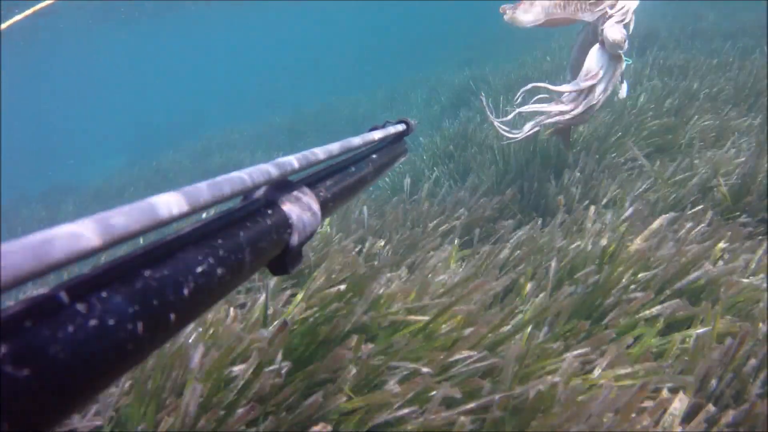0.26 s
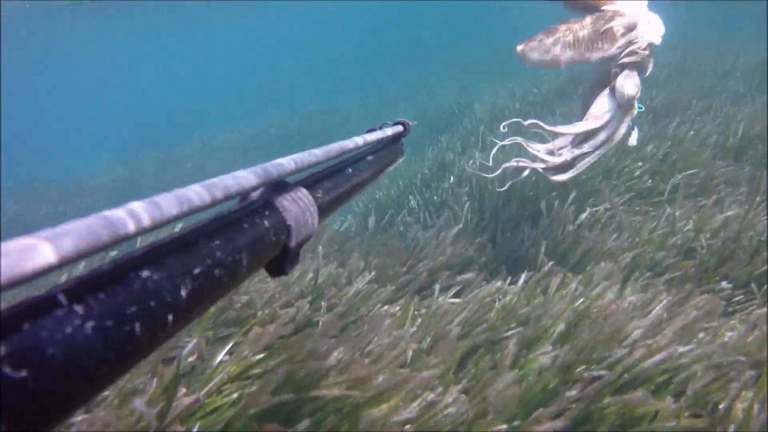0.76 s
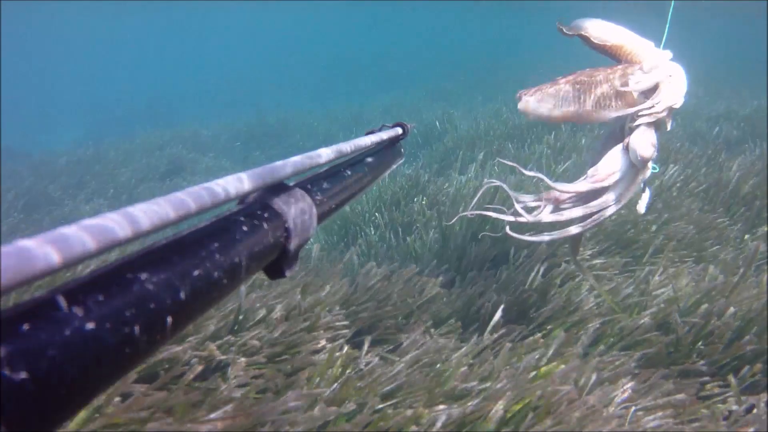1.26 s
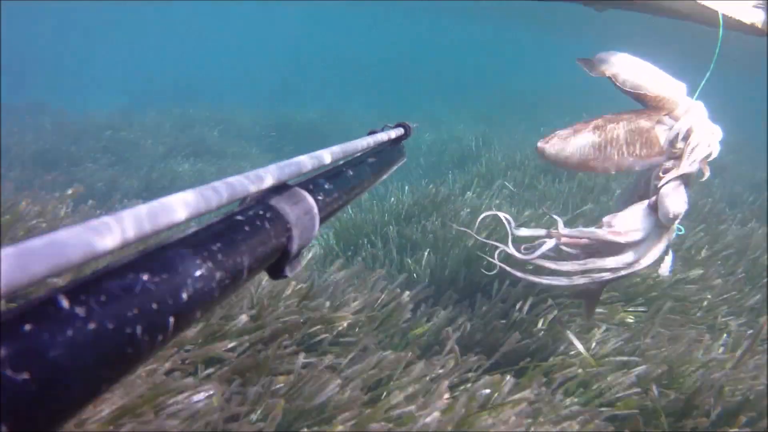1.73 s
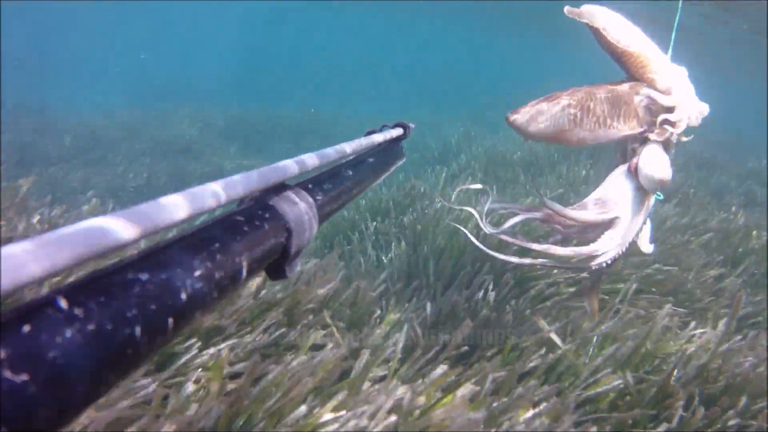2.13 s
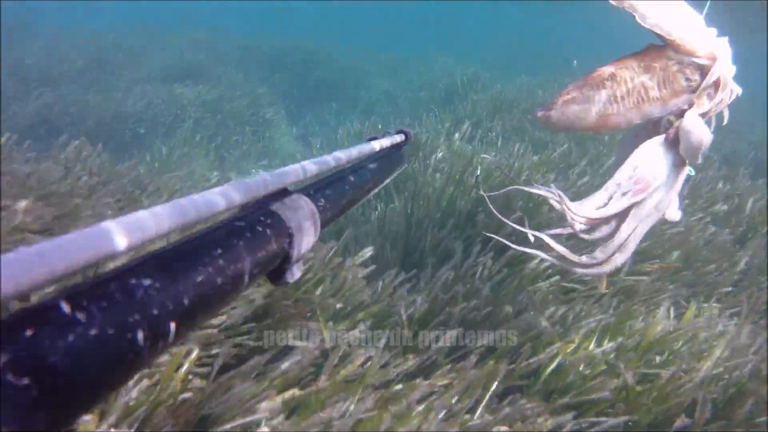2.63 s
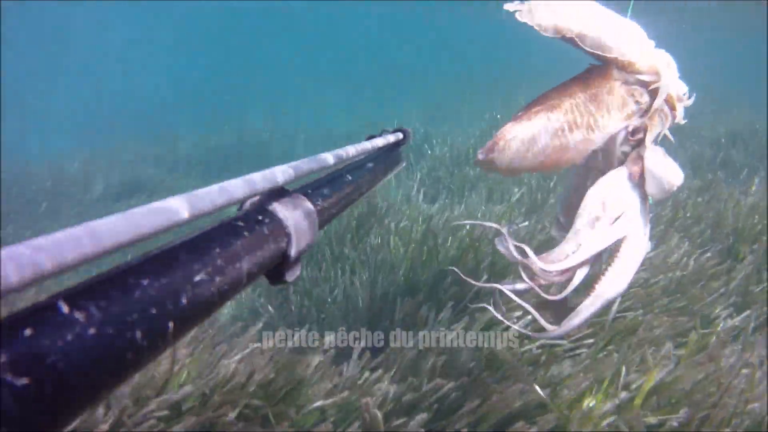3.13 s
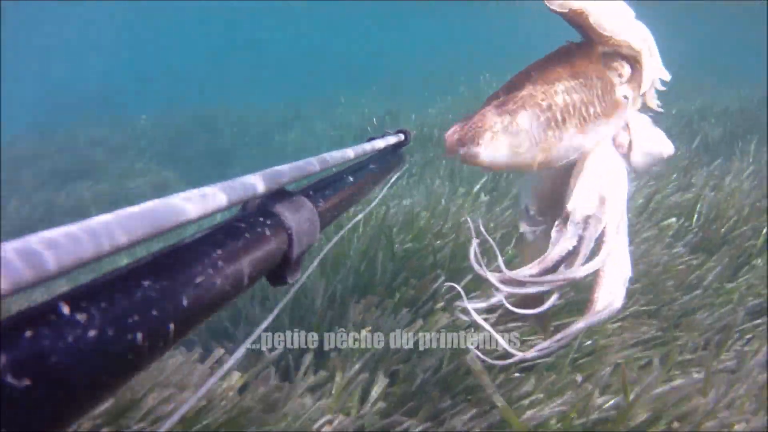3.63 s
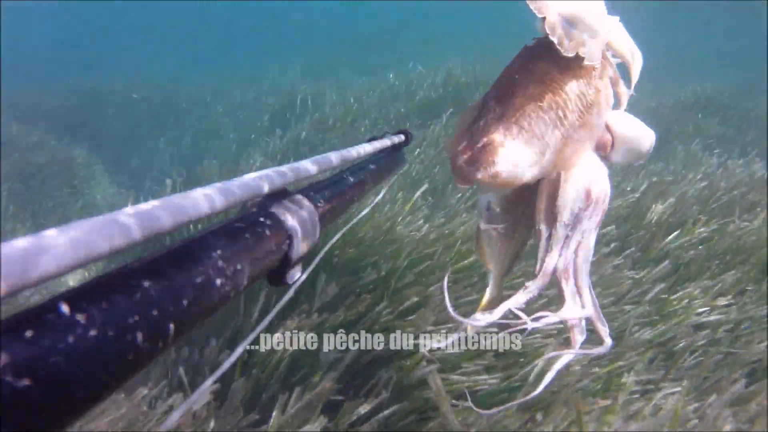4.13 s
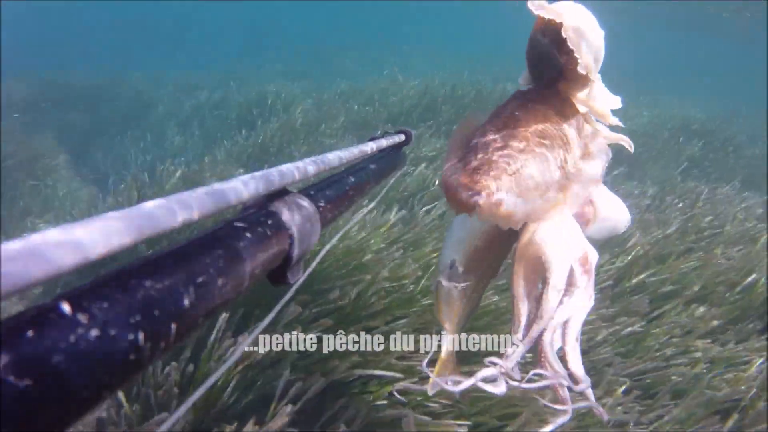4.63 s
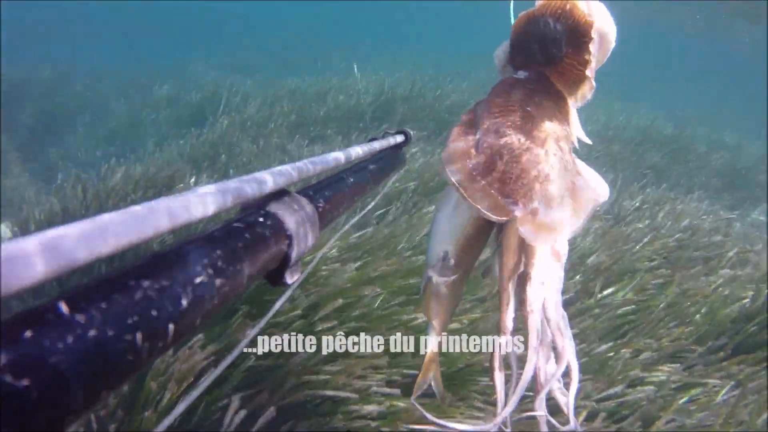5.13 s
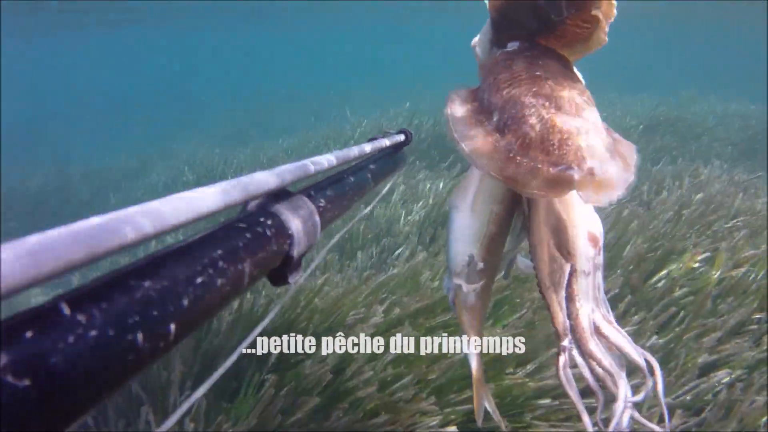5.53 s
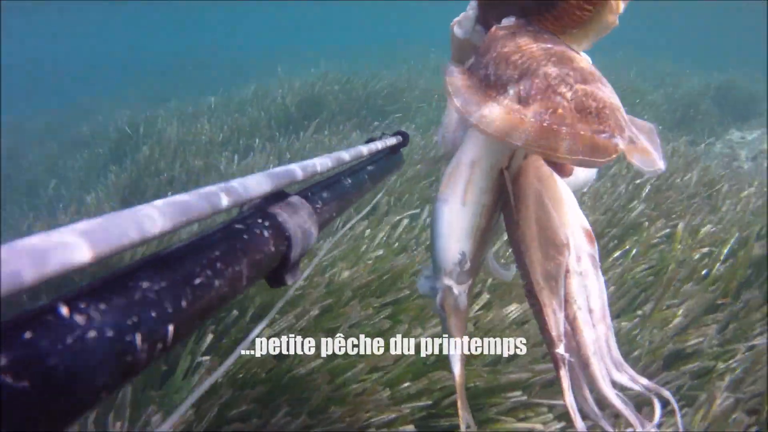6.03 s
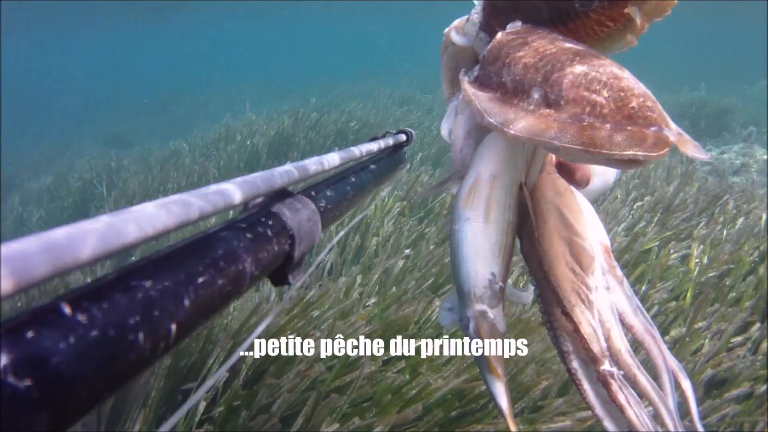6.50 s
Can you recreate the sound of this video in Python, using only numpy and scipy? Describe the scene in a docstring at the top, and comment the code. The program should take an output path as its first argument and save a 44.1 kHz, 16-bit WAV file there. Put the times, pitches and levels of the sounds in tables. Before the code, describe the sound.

Close, muffled underwater sound from a microphone sealed in a small housing. A faint wash and thin high hiss run throughout with scattered dry snaps, likely shrimp. A bubbly gulp and knock come early, then a hard bright clatter after two seconds, a heavier run of hollow clunks and rubbing past three, and softer bumps, sloshes and small bubbles until a loud snap near six.

```python
"""Inside a waterproof camera housing: a diver glides over seagrass with a speargun and a hanging catch.
Gear knocks and stutters as damped resonances of the housing; straps rub as jerky slips that ring it.
Water washes faintly and sloshes as lumpy coloured noise, and bubbles sound as decaying, rising tones.
Sharp ticks, likely snapping shrimp, are clusters of short high resonances.
The electronics add a band of high hiss and a thin, steady sine whine."""
import sys
import numpy as np
from scipy.fft import rfft, irfft, next_fast_len
from scipy.io import wavfile
from scipy.ndimage import map_coordinates

SR = 44100
rng = np.random.default_rng(int(sys.argv[2]) if len(sys.argv) > 2 else 0)


def dump(signal):
    """Clip the signal to [-1, 1] and save it as 16-bit WAV at the path in sys.argv[1]."""
    limited = np.clip(np.atleast_2d(signal).T, -1, 1)
    pcm = np.round(limited * 32767).astype(np.int16)
    wavfile.write(sys.argv[1], SR, pcm)


N = 298116


def amp(db):
    """Level law: decibels to amplitude gain."""
    return 10 ** (np.asarray(db) / 20)


def unit(x):
    """Normalization: x at an rms of 1."""
    return x / np.sqrt(np.mean(x ** 2) + 1e-20)


def clock():
    """Uniform sampling: the time of every sample [s]."""
    return np.arange(N) / SR


def wobble(rate):
    """Band-limited random modulation: a smooth curve through rate random knots a second."""
    knots = rng.standard_normal(int(N * rate / SR) + 4)
    return map_coordinates(knots, [clock() * rate])


def coloured(x, points):
    """Linear filtering: x shaped by points (frequency [Hz], relative level [dB]), at an rms of 1."""
    size = next_fast_len(N + 8192)  # padding keeps the end from wrapping to the start
    hz, db = np.transpose(points)
    log_hz = np.log(np.fft.rfftfreq(size, 1 / SR) + 1)
    gain = amp(np.interp(log_hz, np.log(hz), db))
    return unit(irfft(rfft(x, size) * gain, size)[:N])


def noise(points):
    """Spectral shaping: white noise coloured to an rms of 1."""
    return coloured(rng.standard_normal(N), points)


def swell(t, rise, t60):
    """Transient envelope: a Gaussian build-up to t = 0, then exponential decay by 60 dB in t60 seconds."""
    build_up = np.exp(-(np.minimum(t, 0) / rise) ** 2)
    return build_up * amp(-60 * np.maximum(t, 0) / t60)


def ring(t, hz, rise, t60):
    """Damped resonance: one mode, at its greatest excursion at its crest."""
    return swell(t, rise, t60) * np.cos(2 * np.pi * hz * t)


def stray(t, hz, rise, t60):
    """Damped resonance of incoherent phase: a mode that joins in at a chance phase."""
    return swell(t, rise, t60) * np.sin(2 * np.pi * (hz * t + rng.random()))


def around(s):
    """Local time frame: the samples near the moment s, and their times counted from it."""
    first = max(int((s - .01) * SR), 0)
    last = min(int((s + .15) * SR), N)
    span = np.arange(first, last)
    return span, span / SR - s


def electronics():
    """Self-noise: a high band of hiss and one pure tone."""
    # hiss spectrum: (frequency [Hz], relative level [dB])
    hiss_colour = [(8800, -58), (9800, -13), (11000, -7.5), (12500, -2), (14500, 2), (15500, -1)]
    whine_hz = 7867
    whine = amp(-68) * np.sin(2 * np.pi * whine_hz * clock())
    return amp(-66.5) * noise(hiss_colour) + whine


def effort():
    """Energy addition: gains of rub and slosh, as movements build, ebb, let go and leave a wake."""
    # the diver's movements: (time of full effort [s], build-up [s], hold [s],
    #                         rub of the gear [dB], slosh of the water [dB])
    moves = [(0.401, 0.035, 0.086, -56, -65), (0.54, 0.0032, .03, -40, -53),
             (0.591, 0.018, 0.012, -32.5, -49), (0.68, 0.048, 0.11, -56, -75),
             (1.941, 0.0084, 0.0072, -50.5, -46), (2.249, 0.013, 0.051, -41, -43),
             (2.69, 0.014, 0.15, -52, -56), (2.95, 0.091, 0.2, -56, -67.5), (3.316, 0.008, 0.078, -32, -46),
             (3.42, 0.016, 0.077, -40.5, -46), (3.701, 0.0094, 0.038, -46.5, -59),
             (4.114, 0.0066, .18, -47, -58), (4.533, 0.079, 0.095, -46, -58),
             (4.768, 0.087, 0.078, -50.5, -60), (4.932, 0.041, 0.07, -39.5, -47),
             (5.165, 0.021, 0.016, -48, -45.5), (5.25, 0.018, 0.061, -60, -56),
             (5.487, 0.021, 0.019, -56.5, -57), (5.741, 0.0091, 0.053, -53, -82),
             (5.988, 0.034, 0.046, -42.5, -51.5), (6.14, .02, 0.18, -57.5, -82)]
    sag_db_per_s, release_t60_s = 4, 0.14  # effort ebbs during a movement, then lets go
    wake_db, wake_t60_s = -12, 0.57  # water and gear settle slowly afterwards
    rub, slosh = np.zeros(N), np.zeros(N)
    for s, build, hold, rub_db, slosh_db in moves:
        span = slice(max(int((s - 3 * build) * SR), 0), int((s + hold + 1) * SR))
        t = clock()[span] - s
        since = np.maximum(t - hold, 0)
        build_up = np.exp(-(np.minimum(t, 0) / build) ** 2)
        held = build_up * amp(-sag_db_per_s * np.clip(t, 0, hold))
        release = amp(-60 * since / release_t60_s)
        wake = amp(wake_db - 60 * since / wake_t60_s)
        shape = held * np.maximum(release, wake)
        rub[span] += (amp(rub_db) * shape) ** 2
        slosh[span] += (amp(slosh_db) * shape) ** 2
    return np.sqrt(rub), np.sqrt(slosh)


def water(surge):
    """Flow noise: a faint, restless wash, with lumpy low surges when the diver moves."""
    # wash spectrum: (frequency [Hz], relative level [dB])
    wash_colour = [(12, -32), (25, -10), (100, -12), (300, -7), (600, -4), (900, -1.5), (1300, -6.5),
                   (2000, -10), (2800, -13), (3600, -14), (4300, -19), (4800, -22), (7500, -30),
                   (9000, -50.5)]
    # slosh spectrum: (frequency [Hz], relative level [dB])
    slosh_colour = [(10, -34), (28, -17.5), (55, 7), (100, 2.5), (160, 2), (230, 2), (330, -2.5),
                    (600, -10), (1500, -65)]
    wash = amp(-54.0 + 0.16 * wobble(25)) * noise(wash_colour)
    lumps = amp(3 * wobble(60))
    return wash + surge * unit(noise(slosh_colour) * lumps)


def snaps():
    """Impulsive excitation: each snap rings stiff upper modes of the housing; far ones crackle behind."""
    # near shrimp snaps: (time of the crest [s], level of the main mode [dB], pitch [Hz])
    near = [(0.284, -25.5, 3990), (0.686, -42, 4220), (1.1385, -31, 3670), (1.3327, -40.5, 3660),
            (1.7933, -40.5, 3340), (1.8974, -42, 3560), (2.1986, -38.5, 3350), (2.82, -42, 3330),
            (2.9445, -34, 3320), (2.9901, -42.5, 4080), (3.7841, -42.5, 3450), (3.8103, -45, 3500),
            (3.9749, -41, 3480), (4.5724, -38, 3563), (4.6953, -33.5, 4180), (4.8173, -41.5, 3540),
            (5.034, -40.5, 3530), (5.7398, -40, 4160), (6.0058, -36, 3460), (6.0412, -22, 3680),
            (6.1402, -34.5, 3670), (6.2276, -40, 3400), (6.3382, -40.5, 3620)]
    faintest_db, spread_db = -52, 2.5  # the faintest far snaps; how much louder they come on average
    far = []
    for when, size, pitch in rng.random((100, 3)):
        far_db = faintest_db - spread_db * np.log(1 - size)
        far.append((when * N / SR, far_db, 3000 + 1100 * pitch))
    out = np.zeros(N)
    for s, db, hz in list(near) + far:
        span, t = around(s)
        main = ring(t, hz, rise=0.00058, t60=0.01)
        wall = amp(-9) * stray(t, 4230, rise=0.0022, t60=0.02)
        wall += amp(-4.5) * stray(t, 3335, rise=0.00013, t60=0.013)
        edge = amp(-5) * stray(t, 4950, rise=0.00021, t60=0.0026)
        edge += amp(-27) * stray(t, 6800, rise=0.0012, t60=0.01)
        low = amp(-13.5) * stray(t, 2390, rise=0.00087, t60=0.018)
        out[span] += amp(db) * (main + wall + edge + low)
    return out


def bubbles():
    """Bubble resonance: slightly rising, unsteady notes; small bubbles come in fading puffs and a trickle."""
    # gurgles and single bubbles: (time of the crest [s], level before the waver [dB],
    #                              pitch at the crest [Hz], t60 [s])
    gurgles = [(0.545, -24.5, 595, 0.047), (0.551, -22, 954, 0.08), (0.59, -18, 974, 0.052),
               (0.593, -42, 1740, 0.11), (0.606, -27, 701, 0.086), (0.608, -21, 996, 0.046),
               (0.652, -39.5, 1027, 0.32), (0.7, -47.5, 703, 0.48), (1.803, -44, 872, 0.2),
               (5.755, -33.5, 798, 0.13), (5.788, -37.5, 1207, 0.087), (5.845, -55, 2500, 0.17),
               (5.89, -43.5, 1270, 0.053), (6.103, -41.5, 1500, 0.26), (6.18, -40, 920, 0.13),
               (6.323, -43, 764, 0.18)]
    # puffs of small bubbles let go: (start [s], upper level of the first ones before the waver [dB])
    puffs = [(4.12, -52), (4.52, -49), (5.73, -39.5), (6.09, -46)]
    puff_s, puff_fade_db = .25, 5  # how long a puff lasts; how far it fades
    trickle_db = -58  # upper level of the far trickle, before the waver
    large, fizz = np.zeros(N), np.zeros(N)
    for s, db, hz, t60 in gurgles:
        span, t = around(s)
        large[span] += amp(db) * stray(t, hz * (1 + 0.17 * t), rise=0.0033, t60=t60)
    small = [(when * N / SR, trickle_db) for when in rng.random(180)]
    for s, db in puffs:
        for age in rng.random(20) ** 1.5:  # the power crowds bubbles toward the start
            small.append((s + puff_s * age, db - puff_fade_db * age))
    for (s, db), (size, pitch) in zip(small, rng.random((len(small), 2))):
        span, t = around(s)
        rising_hz = 720 * 3.4 ** pitch * (1 + 0.35 * t)
        level = amp(db - 5 * size - 7 * pitch)  # higher notes are fainter
        fizz[span] += level * ring(t, rising_hz, rise=0.0022, t60=0.1)
    return large * amp(2 * wobble(200)) + fizz * amp(4 * wobble(200))


def thuds():
    """Low-frequency damped resonance: soft, dull pushes that die away quickly."""
    # soft bumps of the hand and large gulps of water: (time of the crest [s], peak level [dB], pitch [Hz])
    pushes = [(0.61, -40.5, 159), (1.953, -45, 147.5), (2.745, -41, 146), (2.787, -42.5, 46.7),
              (3.333, -26, 233), (4.349, -49, 160), (4.968, -36, 134), (5.165, -44.5, 56),
              (5.184, -44, 177)]
    out = np.zeros(N)
    for s, db, hz in pushes:
        span, t = around(s)
        out[span] += amp(db) * ring(t, hz, rise=.004, t60=0.13)
    return out


def rubbing(pressure):
    """Stick-slip friction: straps jerk and ring the housing; firm pressure wakes its stiffer wall modes."""
    # the housing's main response to rubbing: (frequency [Hz], relative level [dB])
    rub_colour = [(100, -31), (220, -12), (400, -2.5), (680, -4), (850, 4), (1080, -0.5), (1350, -14),
                  (1700, -18.5), (2600, -44), (4000, -28), (9000, -85)]
    # its stiffer wall modes: (frequency [Hz], relative level [dB])
    wall_colour = [(1200, -58), (1950, -26), (2250, -9.5), (2550, 11), (2900, -5), (3700, -15), (5000, -54),
                   (9000, -65.5)]
    slipping = rng.random(N) < 900 / SR  # about 900 jerks a second
    jerks = unit(slipping * np.sign(rng.standard_normal(N)))
    slips = jerks + .5 * rng.standard_normal(N)
    main = pressure * coloured(slips, rub_colour)
    wall = amp(9.5) * pressure ** 2 * coloured(slips, wall_colour)
    return main + wall


def contacts(pressure):
    """Repeated impact: (s, dB, Hz, treble dB) of knocks, their weakening bounces and taps of rubbing gear."""
    # gear striking the housing: (time of the crest [s], level before the final trim [dB], pitch [Hz],
    #                             treble setting [dB], length of its chatter [s])
    strikes = [(0.39, -34.5, 824, -31, 0.00064), (0.5919, -14.5, 1010, -39, 0.0026),
               (0.6133, -24, 845, -33, 0), (1.1407, -27, 1120, -10, 0.00071), (1.3325, -34, 910, -15.5, 0),
               (1.7605, -34, 760, -24, .007), (1.9468, -33, 880, -29, 0.00066),
               (2.1035, -41.5, 950, -4.5, 0.0014), (2.2083, -41, 1370, 1.5, 0.0021),
               (2.2384, -22, 1010, -5, 0), (2.2438, -21, 920, -23, 0), (2.248, -10.5, 1450, -6, 0),
               (2.252, -14, 1620, -3, 0.0104), (2.267, -27, 1160, -27, 0.00021),
               (2.2877, -17.5, 805, -22, 0.0302), (2.6268, -34.5, 1060, -31, 0.0014),
               (2.8362, -37.5, 693, -18, 0), (2.974, -30.5, 1100, -20, 0),
               (3.2015, -29.5, 1084, -30, 0.0024), (3.317, -22.5, 960, -18, 0),
               (3.3223, -14.5, 835, -24.5, .021), (3.3692, -8.5, 796, -30, 0),
               (3.3765, -16, 773, -38, 0.025), (3.4077, -20.5, 860, -34, 0),
               (3.4504, -10.5, 780, -27, .006), (3.4894, -12.5, 790, -47, 0.0019),
               (3.5587, -30.5, 1059, -31, 0.0033), (4.1253, -29.5, 810, -15, 0),
               (4.2555, -33, 900, -17, 0.0023), (4.306, -30, 1080, -28, 0.0035),
               (4.5736, -23.5, 920, -25, 0.0118), (4.626, -45.5, 1000, -7.5, .011),
               (4.77, -40.5, 1250, -0.5, 0.0037), (4.9369, -26.5, 766, -45, 0.029),
               (4.9781, -25.5, 1130, -20, 0.0015), (5.1757, -34.5, 913, -23, 0),
               (5.288, -39, 586, -27, 0.0027), (5.4949, -36.5, 670, -18, 0), (5.7312, -34, 1080, -12, 0),
               (5.7453, -29.5, 903, -13, 0.018), (5.995, -23, 966, -21, 0.027),
               (6.135, -25, 1050, -12, .007)]
    bounce_gap_s, chatter_loss_db, scatter_db = .0048, 14, 2  # spacing; loss over the chatter; unevenness
    taps_per_s, tap_over_rub_db, tap_hz, tap_treble_db = 30, 14, 870, -12.5  # loose gear
    tap_most_db = -39.5  # loose gear is too light to strike harder
    rows = []
    for s, db, hz, treble_db, chatter in strikes:
        rows.append((s, db, hz, treble_db))
        for k, (late, size, pitch) in enumerate(rng.standard_normal((12, 3)), 1):
            delay = k * bounce_gap_s
            if delay < chatter:
                bounce_db = db - chatter_loss_db * delay / chatter + scatter_db * size
                rows.append((s + delay + 0.00039 * late, bounce_db, hz * np.exp(.08 * pitch), treble_db))
    for k, (when, size, pitch) in enumerate(rng.random((250, 3))):
        s = (k + when) / taps_per_s  # one tap at a chance moment of each slot
        if s < (N - 1) / SR:
            rub_db = 20 * np.log10(pressure[int(s * SR)] + 1e-6)
            tap_db = min(rub_db + tap_over_rub_db, tap_most_db) - 8 * size
            rows.append((s, tap_db, tap_hz * 1.6 ** (pitch - .5), tap_treble_db))
    return rows


def knocks(pressure):
    """Modal impact: water damps the body in a few cycles; brighter contacts add more wall mode and crack."""
    # crack spectrum: (frequency [Hz], relative level [dB])
    crack_colour = [(100, -11.5), (600, -6), (1500, 8.5), (2250, -5), (2650, -6), (3400, -7.5), (4200, -14),
                    (4700, -13), (6000, -20), (8000, -29), (9100, -48), (10500, -28.5), (15000, -35)]
    body, contact_power = np.zeros(N), np.zeros(N)
    for s, db, hz, treble_db in contacts(pressure):
        span, t = around(s)
        life = 10.8 / hz  # every pitch rings for the same number of cycles
        main = ring(t, hz, rise=.0015, t60=life)
        after_hz = 850 * np.exp(0.234 * rng.normal())
        after = amp(-16.5) * stray(t, after_hz, rise=0.0064, t60=0.042)
        wall = amp(0.67 * treble_db - 5.5) * stray(t, 2297, rise=0.0018, t60=0.012)
        body[span] += amp(db) * (main + after + wall)
        crack = amp(db + 1.125 * treble_db) * swell(t, rise=0.0011, t60=0.023)
        contact_power[span] += crack ** 2
    return amp(0.4) * body + amp(3.5) * np.sqrt(contact_power) * noise(crack_colour)


def scene():
    """Superposition: all sources add at one microphone inside the housing."""
    pressure, surge = effort()
    background = water(surge) + electronics()
    events = thuds() + snaps() + bubbles()
    gear = rubbing(pressure) + knocks(pressure)
    return (background + events + gear)[None]


def record(dry):
    """Band limitation: the sound opens after a moment and holds nothing above the upper limit."""
    top_hz = 15600
    opening = np.clip((clock() - .054) / .004, 0, 1)  # silent for 54 ms, then a 4 ms ramp
    passed = np.fft.rfftfreq(N, 1 / SR) < top_hz
    return irfft(rfft(dry * opening) * passed, N)


dry = scene()
out = record(dry)
dump(out)
```